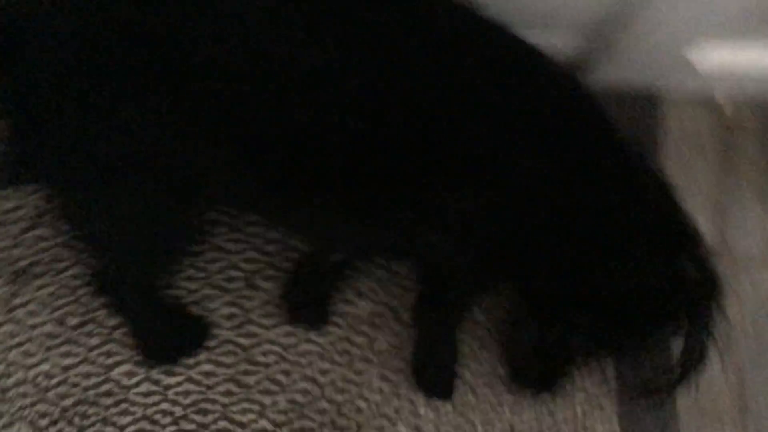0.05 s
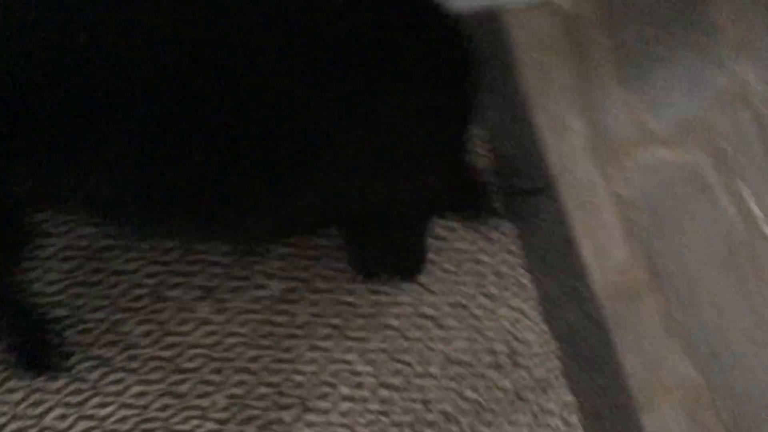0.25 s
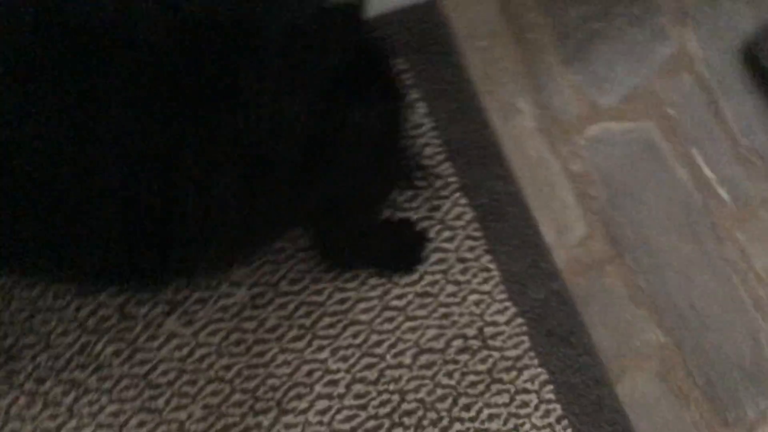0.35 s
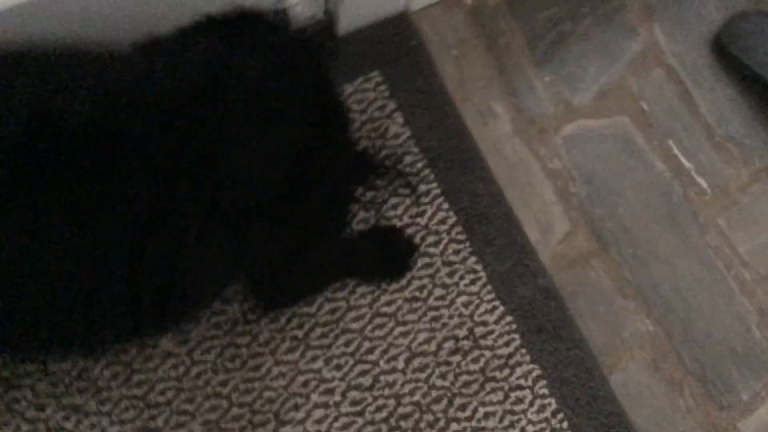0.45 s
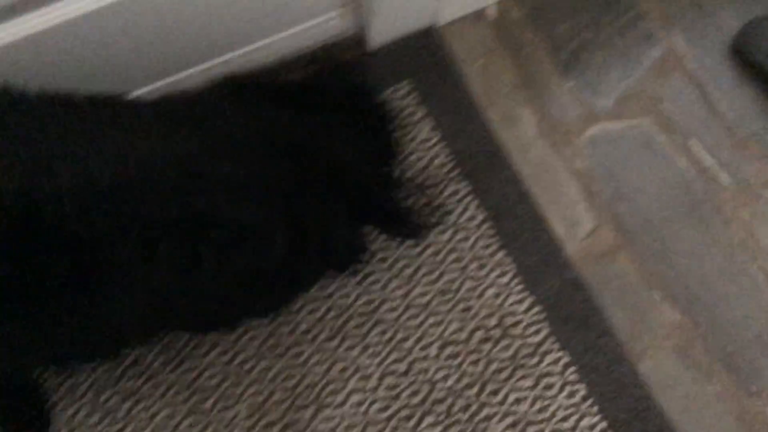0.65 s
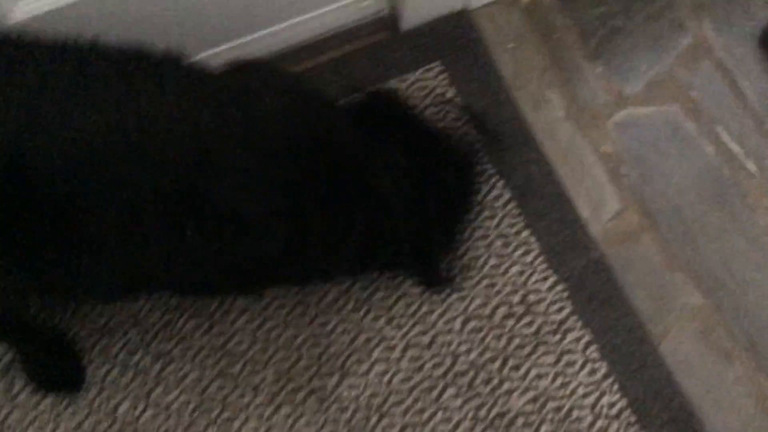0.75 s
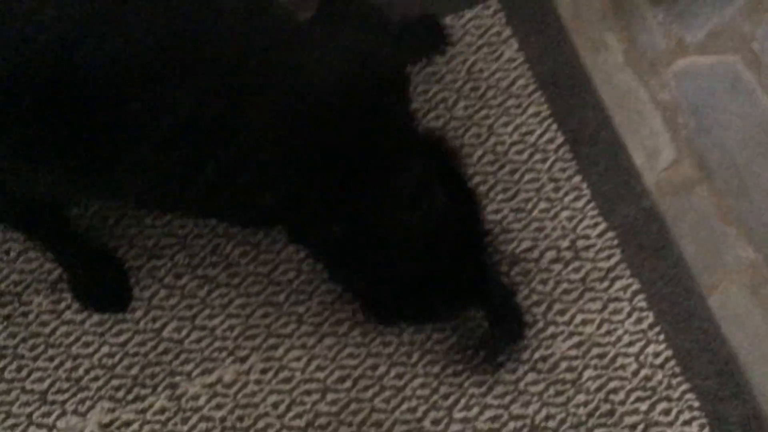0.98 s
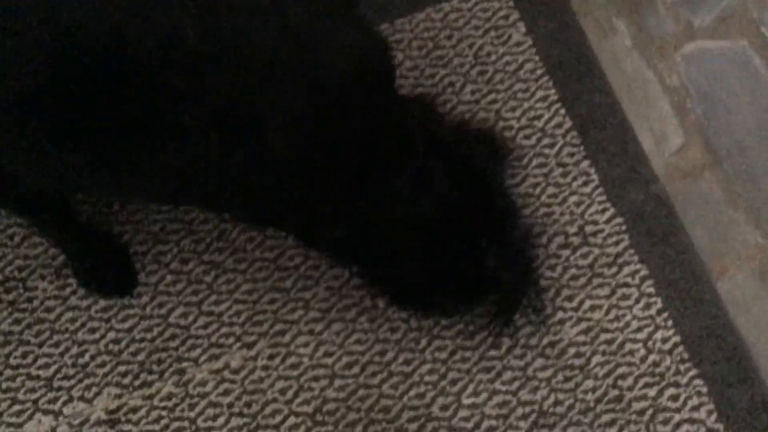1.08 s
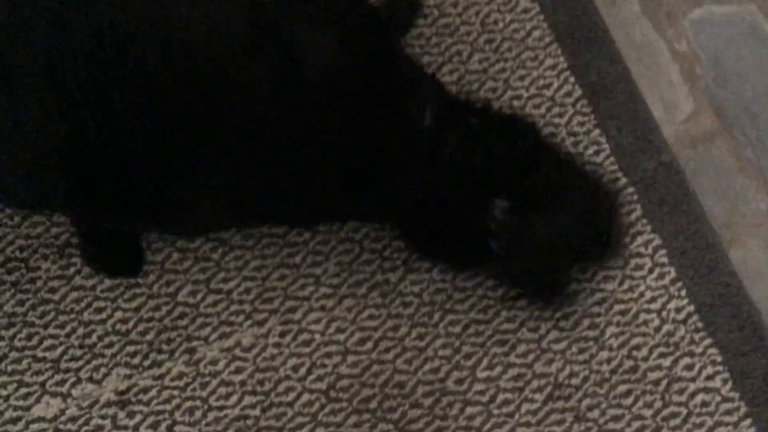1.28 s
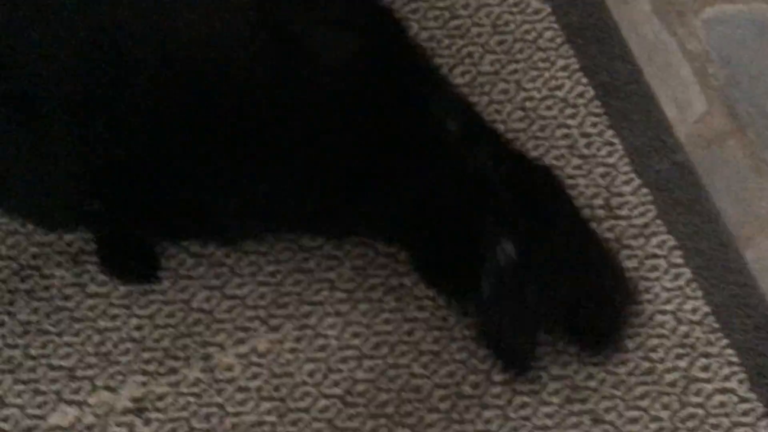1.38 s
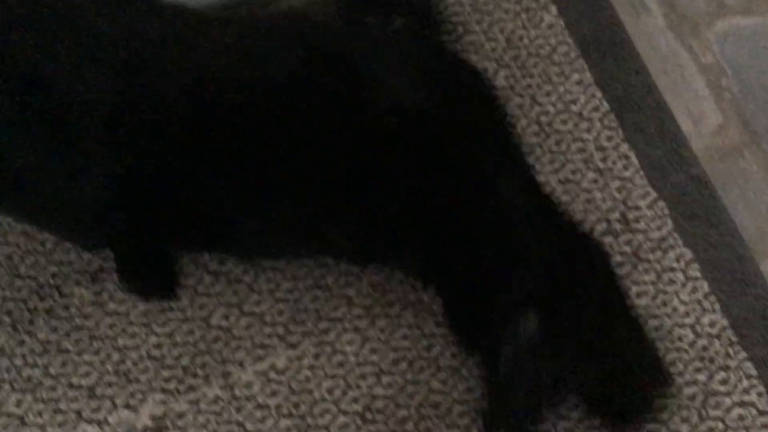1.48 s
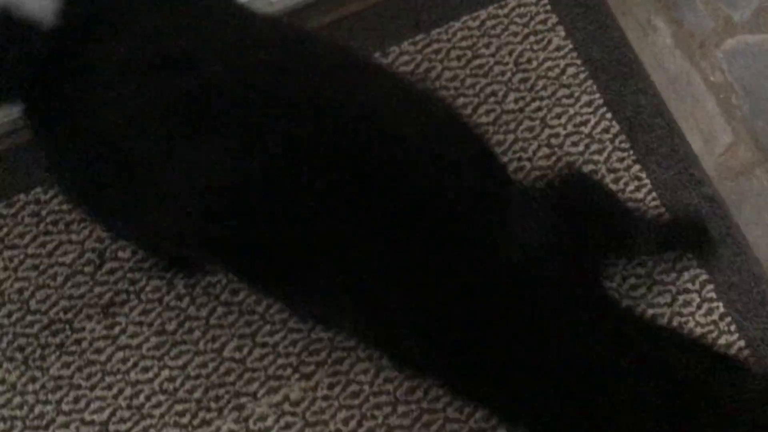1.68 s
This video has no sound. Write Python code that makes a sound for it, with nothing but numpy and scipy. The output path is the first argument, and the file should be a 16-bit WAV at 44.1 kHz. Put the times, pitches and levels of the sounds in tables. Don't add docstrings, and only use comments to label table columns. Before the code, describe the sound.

Heavy dog flop on a rug, gritty rubbing with claw ticks, then two sharp nasal snorts

```python
import sys
import numpy as np
from scipy import signal
from scipy.io import wavfile
from scipy.ndimage import uniform_filter1d

SR = 44100
rng = np.random.default_rng(int(sys.argv[2]) if len(sys.argv) > 2 else 0)


def magnitude_from_level(level_db):
    exponent = np.asarray(level_db, float) / 20
    return 10 ** exponent


def master(y):
    cut = np.clip(np.atleast_2d(y).T, -1, 1)
    pcm = np.round(cut * 32767)
    wavfile.write(sys.argv[1], SR, pcm.astype(np.int16))


N = 74970

# frequency in Hz, level in dB per Hz.
HUSH_SPECTRUM = [(30, -22.5), (65, -1), (160, -5.5), (420, -16.5), (1200, -20), (5000, -19), (7500, -27.5),
                 (16000, -26.5)]
# frequency in Hz, T60 in seconds.
ROOM_DECAY = [(100, 0.46), (1000, 0.58), (6000, 0.51), (16000, 0.31)]
# start in seconds, length in seconds, level in dB, from Hz, to Hz.
NOSTRIL_WHISTLES = [(.2605, 0.016, -53, 5400, 5400), (0.261, 0.014, -61.5, 7600, 7100),
                    (0.24, 0.014, -59, 5900, 6500), (.275, .04, -68, 11000, 10000),
                    (.35, 0.099, -63, 5800, 5500), (.39, 0.14, -59, 5600, 5850),
                    (0.31, 0.036, -73, 9000, 8400), (0.4, .08, -76, 7800, 7800),
                    (0.38, .06, -74, 8800, 7000), (.47, 0.077, -64.5, 1400, 3700),
                    (.26, .055, -63, 15300, 15200), (.26, .05, -67, 14500, 14500),
                    (1.33, 0.16, -65, 2133, 2400), (1.309, 0.042, -43.5, 2050, 1950),
                    (1.14, 0.033, -50, 1900, 1900)]
# start in seconds, rise in seconds, T60 in seconds, level in dB,
# tilt in dB per octave.
SNIFF_STROKES = [
    (.256, 0.006, 0.37, -52.5, -6.5),
    (.33, 0.16, 0.43, -62.5, -6),
    (.60, 0.083, 0.64, -59, -6),
    (.915, 0.095, 0.7, -50, 0),
    (1.0, 0.078, 0.53, -44.5, 0),
]
# start in seconds, rise in seconds, T60 in seconds, level in dB,
# tilt in dB per octave.
SNORT_STROKES = [
    (1.1408, 0.00095, 0.13, -33.5, 2.5),
    (1.16, 0.04, 0.44, -58.5, -1),
    (1.3102, 0.00047, 0.18, -31, -0.5),
    (1.33, 0.0046, 0.35, -40, 1.5),
    (1.345, 0.011, 0.26, -44, 0),
    (1.385, 0.02, 0.22, -42, 0.5),
    (1.44, 0.023, 0.25, -47.5, -2),
]
# frequency in Hz, level in dB per Hz.
SNIFF_SPECTRUM = [(500, -26.5), (1500, -13.5), (2500, -3), (3600, -11), (5600, -1), (7200, -6.5),
                  (9000, -1.5), (16000, -3)]
# frequency in Hz, level in dB per Hz.
SNORT_SPECTRUM = [(300, -33), (1600, -19), (1950, -5), (3000, -11.5), (4300, -6), (5500, -6), (7100, -8),
                  (16000, -11.5)]
# time in seconds, peak in dB, pitch in Hz.
WET_SPURTS = [(1.3104, -24.5, 5260), (1.3108, -39.5, 2050), (1.313, -23.5, 5560), (1.3153, -25.5, 4650),
              (1.319, -25.5, 5650), (1.3215, -31, 4850), (1.3238, -24.5, 5800), (1.3248, -26.5, 5800),
              (1.327, -30, 5330), (1.3293, -25.5, 4900), (1.334, -36, 5000), (1.3515, -46, 5600),
              (1.3115, -28.5, 3800), (1.3195, -31, 3780), (1.329, -39, 4000), (1.3435, -41, 5040),
              (1.4035, -38, 4720), (1.410, -38, 5340), (1.416, -36, 5700), (1.4245, -40, 5270),
              (1.1413, -34, 6000), (1.1425, -39, 3430), (1.143, -42, 4930), (1.1432, -38.5, 1885),
              (1.1452, -33, 4530), (1.1495, -50, 4800), (1.1545, -48, 5550)]
# time in seconds,
# peak in dB, pitch in Hz.
CLAW_TICKS = [(0.0512, -47.5, 2460), (0.0518, -43, 7200), (0.111, -54, 2110), (0.1357, -48.5, 2250),
              (0.136, -48, 5770), (.1985, -27, 2040), (.1992, -20.5, 261.6), (.2066, -26.5, 268),
              (.7335, -40.5, 1880), (.7425, -43, 2120), (.7825, -44.5, 910), (.8015, -45, 780),
              (.773, -46, 5000), (.777, -45, 2000), (.8005, -45, 3800), (.813, -46, 1410),
              (.758, -44, 3500), (.823, -43, 1810), (.2835, -46, 2800), (.199, -35, 4720),
              (.3805, -44.5, 696), (0.716, -43.5, 2100), (0.7332, -33, 5900), (0.7385, -42, 4340),
              (.742, -38, 5100), (0.7558, -34.5, 2270), (0.7564, -36, 5560), (.7615, -48, 4380),
              (.768, -37, 1530), (.7876, -40, 5900), (.789, -37.5, 1500), (.793, -38, 2470),
              (.7934, -44, 4600), (.810, -39, 940), (.80, -39.5, 1420), (.9497, -40, 1195),
              (.951, -46, 650), (0.9504, -43, 4340), (1.4512, -32.5, 3760)]
# time in seconds, peak in dB, pitch in Hz.
BODY_THUDS = [(.02, -60, 61.6), (.105, -58.5, 66), (.1995, -27.5, 417.5), (.2, -34, 130),
              (.218, -31.5, 253), (.54, -63, 66), (.59, -58.5, 190), (1.315, -50.5, 220),
              (1.38, -53.5, 222), (1.44, -60, 73), (1.58, -61.5, 65.5), (.236, -32, 183), (.267, -40, 173),
              (.285, -58, 270), (.305, -48.5, 142), (.375, -46, 340), (.704, -49.5, 170), (.79, -49.5, 171),
              (.84, -56, 168), (.947, -48.5, 260), (1.097, -51.5, 207), (1.16, -47, 251), (.252, -46, 370),
              (.42, -49, 188), (.485, -53.5, 730), (.86, -70, 70), (1.02, -58, 109), (1.165, -49.5, 125),
              (1.19, -59, 60.3), (1.33, -46.5, 85), (1.465, -50, 185)]
# time in seconds, peak in dB, pitch in Hz.
STONE_KNOCKS = [(.2, -44, 980), (.236, -40.5, 375.6), (.222, -48.5, 1100), (.455, -56, 349),
                (1.315, -52, 699), (1.312, -46.5, 1310), (.222, -43, 534), (.245, -50.5, 808),
                (1.44, -58.5, 470), (.478, -56.5, 810), (.51, -57.5, 710), (.75, -49.5, 349.6),
                (.782, -45.5, 706), (.785, -55.5, 571), (.95, -53.5, 722), (.95, -58.5, 401),
                (1.105, -56, 473), (1.145, -48.5, 575.5), (1.15, -49.5, 980), (1.2, -58.5, 571),
                (1.21, -59, 712)]
# start in seconds, rise in seconds, T60 in seconds,
# level in dB, tilt in dB per octave.
SCUFF_STROKES = [(0., 0.017, 0.75, -63.5, 5.5), (.05, 0.014, .5, -84, 10), (.125, 0.025, 0.17, -72, 2),
                 (1.52, 0.012, 0.98, -62.5, 5.5), (.30, 0.037, 0.89, -62, -3),
                 (.37, 0.0055, 0.61, -54.5, -2.5), (.47, 0.021, 0.31, -57.5, -1.5),
                 (.62, 0.08, 0.55, -57, -5.5), (.69, 0.052, 0.3, -50, 3.5), (.75, 0.034, 0.42, -47.5, 2.5),
                 (.949, 0.0014, 0.68, -50.5, 3.56), (1.07, 0.046, 0.4, -51, 0.5),
                 (1.14, 0.027, 0.22, -48, 5), (1.31, 0.019, 0.35, -49.5, 1.5), (1.44, 0.011, 0.94, -59, -4)]
# frequency in Hz, level in dB per Hz.
PILE_SPECTRUM = [(60, -19.5), (150, 0.5), (350, 0), (500, -4), (720, -2), (2000, -13.5), (5000, -25.5),
                 (16000, -51)]
# frequency in Hz, level in dB, T60 in seconds.
FLOOR_RESONANCES = [(70, -6.5, 0.091), (130, -12, 0.11), (172.7, -11, 0.14), (215, -12.5, 0.15),
                    (259.4, -2.5, 0.15), (360.6, -6.5, 0.2), (565, -17, 0.09), (724, -9.5, 0.1),
                    (432, -4.5, 0.07), (333, -10.5, 0.15), (980, -17, 0.047)]
# frequency in Hz, level in dB per Hz.
SLAP_SPECTRUM = [(100, -1), (300, 13.5), (600, -5), (1500, -5.5), (2400, -13.5), (3200, -25.5),
                 (6000, -26.5), (16000, -59)]
# delay in seconds, level in dB.
LANDING_SLAPS = [
    (0., 3),
    (.0095, -3.5),
    (0.015, -4.5),
]
# frequency in Hz, gain in dB.
CAPSULE = [(28, -21.5), (62, 1), (1300, -3), (2300, 2), (3500, -2.5), (5300, 4), (7200, -9.5), (16000, -19)]
# frequency in Hz, gain in dB.
CAPSULE_TREBLE = [(6500, 0), (7500, -1), (8800, 4.5), (10500, -1), (12200, -2.5), (14500, 4.5),
                  (15700, 4.5), (15950, -18)]


def read(points, hz):
    point_hz, value = np.transpose(points)
    return np.interp(np.log(hz + 1), np.log(point_hz + 1), value)


def evened(x):
    return x / np.sqrt(np.mean(x ** 2) + 1e-20)


def colour(x, points, tilt_db=0.):
    hz = abs(np.fft.fftfreq(8192, 1 / SR))
    gain_db = read(points, hz) + tilt_db * np.log2((hz + 30) / 1000)
    log_gain = np.log(magnitude_from_level(np.maximum(gain_db, -100)))
    taps = np.fft.ifft(np.exp(np.conj(signal.hilbert(log_gain)))).real[:4096]
    return signal.oaconvolve(x, taps)[:len(x)]


def add(mix, start_s, sound):
    part = mix[round(start_s * SR):][:len(sound)]
    part += sound[:len(part)]


def strokes(rows, points, clumps_hz, clumps_db, grit):
    out, t = np.zeros(N), np.arange(SR // 2) / SR
    pole = np.exp(-2 * np.pi * clumps_hz / SR)
    for start_s, rise_s, t60_s, db, tilt_db in rows:
        noise, slow = rng.standard_normal((2, len(t)))
        snaps = 1 + grit * (rng.random(len(t)) < 0.01)
        clumps = evened(signal.lfilter([1], np.poly([pole, pole]), slow))
        drive = noise * magnitude_from_level(clumps_db * clumps) * snaps
        rise = np.sin(np.pi / 2 * np.minimum(t / rise_s, 1)) ** 2
        swell = rise * magnitude_from_level(-60 * np.maximum(t - rise_s, 0) / t60_s)
        steady_rms = np.std(colour(drive, points, tilt_db))
        add(out, start_s, magnitude_from_level(db) * colour(swell * drive, points, tilt_db) / steady_rms)
    return out


def pings(rows, cycles, snap):
    t, out = np.arange(6000) / SR, np.zeros(N)
    for start_s, db, hz in rows:
        u = 2 * t * hz / cycles
        tone = np.sin(2 * np.pi * hz * t) * np.e * u * np.exp(-u)
        crack = rng.standard_normal(len(t)) * np.exp(-t / 0.00078)
        crack = uniform_filter1d(uniform_filter1d(crack, size=5), size=4)
        add(out, start_s, magnitude_from_level(db) * (tone + snap * crack))
    return out


def hush():
    noise = colour(rng.standard_normal(N + 4096), HUSH_SPECTRUM)[4096:]
    return magnitude_from_level(-63) * evened(noise)


def room(x):
    echoes = np.zeros(SR // 2)
    at = np.arange(160, len(echoes) - 20, 20)
    echoes[at + rng.integers(0, 20, len(at))] = rng.choice([-1., 1.], len(at))
    hz, t, z = signal.stft(echoes, SR, nperseg=256)
    decay = magnitude_from_level(-60 * t / read(ROOM_DECAY, hz)[:, None])
    tail = signal.istft(z * decay, SR, nperseg=256)[1]
    return magnitude_from_level(-9.5) * signal.fftconvolve(x, tail / np.linalg.norm(tail))[:N]


def whistles():
    width_hz = 540
    out, pole = np.zeros(N), np.exp(-np.pi * width_hz / SR)
    for start_s, length_s, db, from_hz, to_hz in NOSTRIL_WHISTLES:
        u = np.arange(0, length_s, 1 / SR) / length_s
        air = rng.standard_normal((2, SR // 2))
        slow = signal.lfilter([1], np.poly([pole, pole]), air[0] + 1j * air[1])[:len(u)]
        turns = np.cumsum(from_hz + (to_hz - from_hz) * u) / SR
        tone = (slow * np.exp(2j * np.pi * turns)).real
        add(out, start_s, magnitude_from_level(db) * np.sin(np.pi * u) * evened(tone))
    return out


def sniffs():
    return strokes(SNIFF_STROKES, SNIFF_SPECTRUM, clumps_hz=78.5, clumps_db=1.0, grit=0.3)


def snorts():
    air = strokes(SNORT_STROKES, SNORT_SPECTRUM, clumps_hz=233, clumps_db=3.0, grit=0.5)
    return air + pings(WET_SPURTS, cycles=3.7, snap=0.16)


def claw_ticks():
    return pings(CLAW_TICKS, cycles=1.6, snap=0.3)


def weight_shifts():
    return pings(BODY_THUDS, cycles=2.42, snap=0) + pings(STONE_KNOCKS, cycles=11.7, snap=0)


def scuffs():
    return strokes(SCUFF_STROKES, PILE_SPECTRUM, clumps_hz=88, clumps_db=1.5, grit=2.9)


def floor_ring(rub):
    t = np.arange(SR // 4) / SR
    ring = sum(magnitude_from_level(db - 200 * t / t60_s) * np.sin(2 * np.pi * hz * t)
               for hz, db, t60_s in FLOOR_RESONANCES[2:])
    return magnitude_from_level(-13.5) * evened(signal.oaconvolve(rub, ring)[:N]) * np.std(rub)


def thump():
    land_s = 0.1985 + 0.001225
    ring_db, slap_db, slap_t60_s, boom_db, boom_t60_s = -26.5, -26, 0.051, -40.5, 0.33
    t, out = np.arange(SR) / SR, np.zeros(N)
    ring = sum(magnitude_from_level(db - 60 * t / t60_s) * np.sin(2 * np.pi * (hz * t + rng.random()))
               for hz, db, t60_s in FLOOR_RESONANCES)
    boom = evened(colour(rng.standard_normal(SR), SLAP_SPECTRUM, tilt_db=-1.5))
    boom = boom * magnitude_from_level(boom_db - 60 * t / boom_t60_s)
    add(out, land_s, (magnitude_from_level(ring_db) * ring + boom) * np.minimum(t / 0.005, 1))
    for delay_s, db in LANDING_SLAPS:
        slap = evened(colour(rng.standard_normal(SR), SLAP_SPECTRUM))
        slap = slap * magnitude_from_level(slap_db + db - 60 * t / slap_t60_s)
        add(out, land_s + delay_s, slap * np.minimum(t / 0.00022, 1))
    return out


def scene():
    nose = whistles() + sniffs() + snorts()
    rub = scuffs()
    body = claw_ticks() + weight_shifts() + rub + floor_ring(rub) + thump()
    dog = nose + body
    return (hush() + room(dog) + dog)[None]


def band_limit(x):
    return signal.sosfilt(signal.butter(12, 16640, fs=SR, output="sos"), x)


def record(dry):
    mix = colour(colour(dry[0], CAPSULE), CAPSULE_TREBLE)[None]
    return band_limit(mix)


dry = scene()
out = record(dry)
master(out)
```